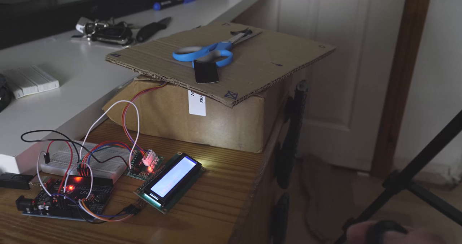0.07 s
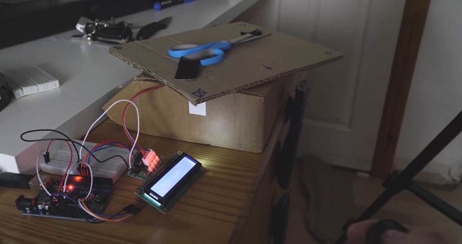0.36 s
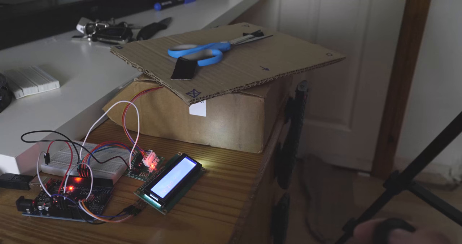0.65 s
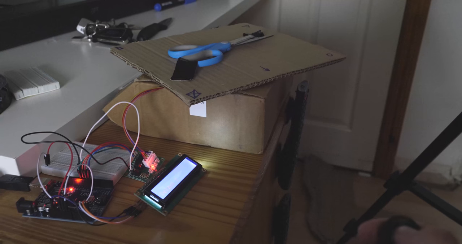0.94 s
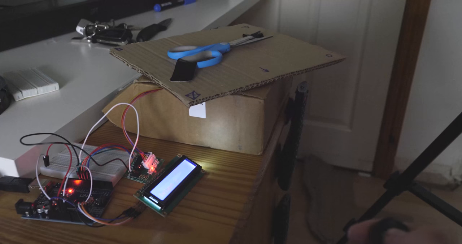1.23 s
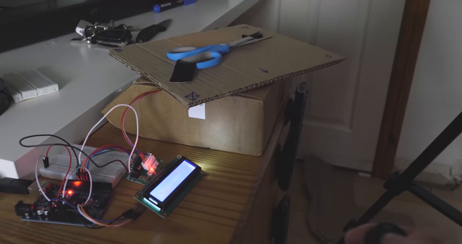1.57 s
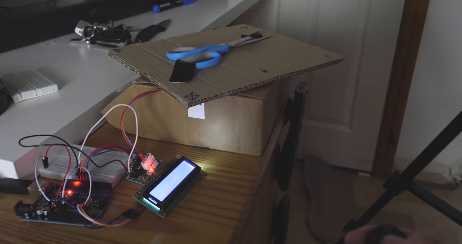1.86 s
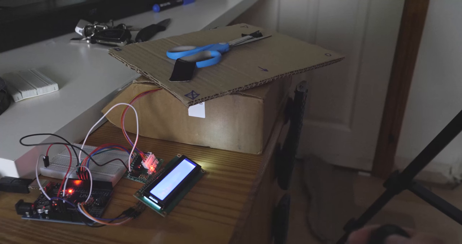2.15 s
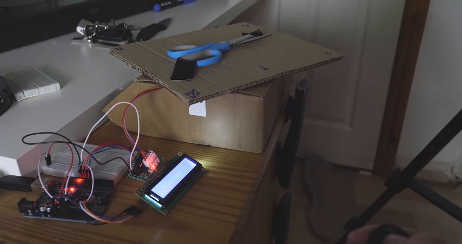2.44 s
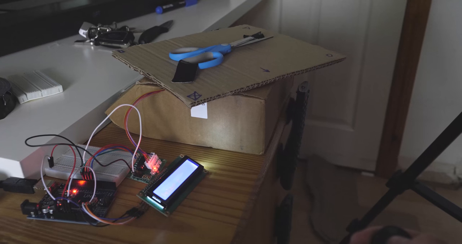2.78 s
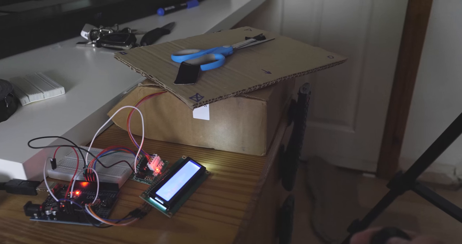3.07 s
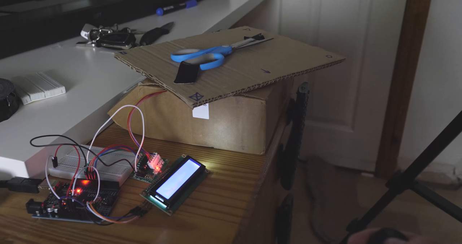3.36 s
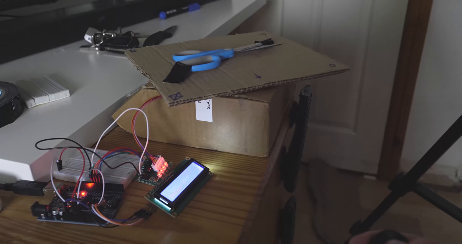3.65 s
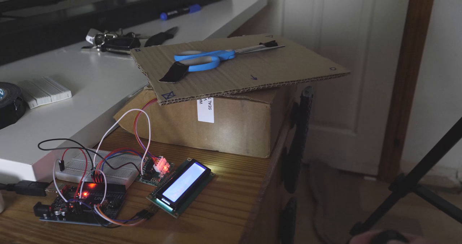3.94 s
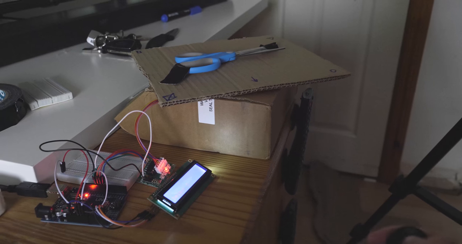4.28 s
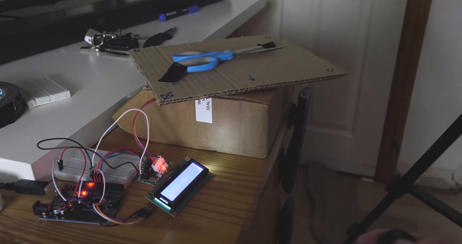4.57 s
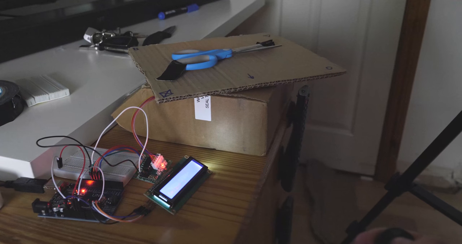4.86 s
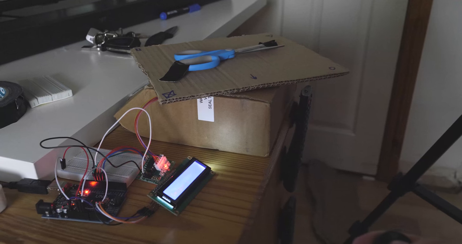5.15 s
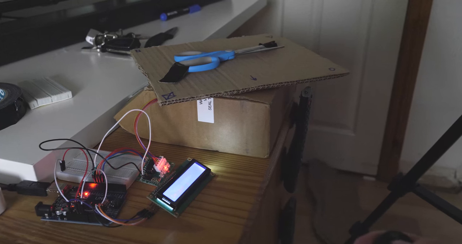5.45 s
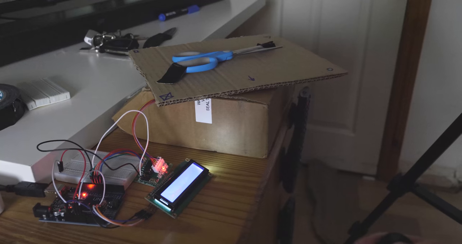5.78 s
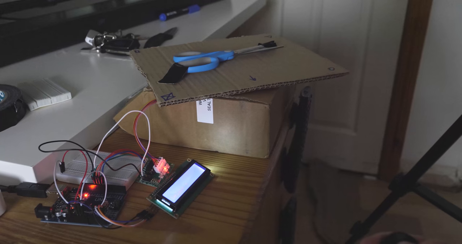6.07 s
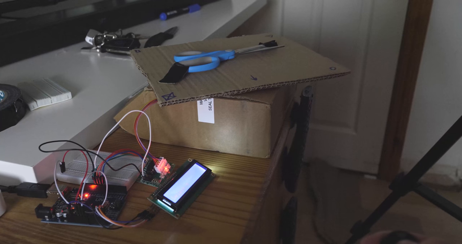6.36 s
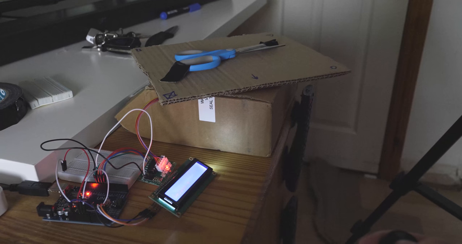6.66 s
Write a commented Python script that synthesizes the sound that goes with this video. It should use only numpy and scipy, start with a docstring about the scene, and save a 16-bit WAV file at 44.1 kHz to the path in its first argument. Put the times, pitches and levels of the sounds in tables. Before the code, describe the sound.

A small fan motor hums faintly and steadily in a small room, with a very thin, high electronic whine. At about 0.3 seconds a cardboard sheet slides briefly over a box, a soft scrape with two tiny squeaks. From 1.0 to 1.4 seconds a nearby reflex camera fires in a quick run of sharp mirror and shutter clicks, with short gear rasps and a slight thud under the heavier ones. A crisp double click follows at 2.0 seconds. Soft, dull handling bumps come at about 3.2 seconds, then a light touch and another short cardboard scrape from 3.5 to 3.9. The camera repeats its run of clicks from 4.3 to 4.7 seconds and its double click at about 5.4. One last faint bump comes near 6.7 seconds over the hum. The clicks are by far the loudest sounds, each with a short ring and little room echo.

```python
"""A reflex camera on a tripod fires in a small room, twice over: its motor cycles mirror and shutter in
a quick run of clicks, and a double click follows a moment later. Each click is a part hitting its stop,
a crack with a short ring; gears rasp ahead of the blows and the body thuds under the heavy ones.
Before each run a cardboard sheet slides over a box, its fibres catching and slipping. There are a few
soft handling bumps, and throughout a small fan motor hums and some electronics whine faintly."""
import sys
import numpy as np
from scipy import signal
from scipy.fft import rfft, irfft, next_fast_len
from scipy.io import wavfile
from scipy.ndimage import uniform_filter1d

SR = 44100
rng = np.random.default_rng(int(sys.argv[2]) if len(sys.argv) > 2 else 0)


def put_to_file(sound):
    """Save the sound as 16-bit audio at rate SR, in the file named by the first command-line argument."""
    columns = np.atleast_2d(sound).T  # one column per channel
    safe = np.clip(columns, -1, 1)
    whole_steps = np.round(safe * 32767)
    wavfile.write(sys.argv[1], SR, whole_steps.astype(np.int16))


N = 300762


def amp(db):
    """Decibels to gain."""
    return 10 ** (np.asarray(db) / 20)


def unit(x):
    """Scale to rms 1."""
    return x / np.sqrt(np.mean(x ** 2))


def pan(db):
    """Left and right gains, with the left louder by db."""
    return amp(np.array([[db], [-db]]) / 2)


def tint(x, points):
    """Equalise along a curve of (Hz, dB) points."""
    hz, db = np.transpose(points)
    size = next_fast_len(len(x) + SR // 10)
    bin_hz = np.maximum(np.fft.rfftfreq(size, 1 / SR), 1)
    gain = amp(np.interp(np.log(bin_hz), np.log(hz), db))
    return irfft(rfft(x, size) * gain, size)[:len(x)]


def even(burst, bins=32):
    """Level a burst's spectrum so that no pitch sticks out, keeping its spread in time."""
    spectrum = rfft(burst, 2 * len(burst))
    smooth_power = uniform_filter1d(np.abs(spectrum) ** 2, bins)
    return irfft(spectrum / np.sqrt(smooth_power))[:len(burst)]


def fade(t, t60):
    """Exponential decay, 60 dB down after t60 seconds."""
    return np.exp(-np.log(1000) * t / t60)


def walk(rate_hz):
    """Random drift of rms 1 that heads for a new value rate_hz times a second."""
    hold = int(SR / rate_hz)
    steps = np.repeat(rng.standard_normal(N // hold + 1), hold)
    return unit(uniform_filter1d(steps, hold)[:N])


def add(track, s, sound):
    """Mix a sound into a track at s seconds."""
    i = int(s * SR)
    track[i:i + len(sound)] += sound[:N - i]


def timed(cues, offset_s, offset_db):
    """Shift (seconds, dB) cues in time and level."""
    return [(s + offset_s, db + offset_db) for s, db in cues]


def spread(mid, side):
    """Stereo image of a diffuse sound, nearly mono in the bass."""
    # Stereo width. Each row: frequency in Hz, side minus mid in dB.
    width = [(130, -85), (300, -25), (600, -11.5), (1500, -6), (5000, -5), (7000, -9.5), (9000, -19),
             (10500, -6), (14000, 0)]
    side = tint(side, width)
    return np.array([mid + side, mid - side])


def near(x, pan_db=-3.5):
    """Direct sound and early echoes from the nearest surfaces."""
    # The top treble leans left. Each row: frequency in Hz, side level in dB.
    treble_side = [(8000, -36), (11000, -22), (13000, -10), (15500, -4)]
    # Desk, door and wall. Each row: delay in seconds, level in dB, left minus right in dB.
    echoes = [(.0011, -46, -10), (.0038, -19.5, 9), (.0085, -21.5, 1), (0.0108, -14.5, 7)]
    out = pan(pan_db) * x + np.array([[1], [-1]]) * tint(x, treble_side)
    for delay, db, side_db in echoes:
        out += amp(db) * pan(side_db) * np.pad(x, (int(delay * SR), 0))[:N]
    return out


def reverb(x, pan_db=0.3, t60=0.24, build_s=0.0061):
    """The short diffuse tail of a small furnished room."""
    # Standing waves. Each row: frequency in Hz, level in dB.
    room_modes = [(932, -47.5), (1360, -47), (2614, -55)]
    # Tone of the tail. Each row: frequency in Hz, gain in dB.
    room_colour = [(200, 9), (1000, 1.5), (3000, 0.5), (7000, 0), (10500, -2.5), (12500, -6), (15500, -3)]
    t = np.arange(SR // 2) / SR
    envelope = fade(t, t60) * (1 - np.exp(-(t / build_s) ** 2))
    mid, side = (even(noise * envelope) for noise in rng.standard_normal((2, len(t))))
    mid += envelope * sum(amp(db) * np.sin(2 * np.pi * hz * t) for hz, db in room_modes)
    response = pan(pan_db) * np.array([tint(ear, room_colour) for ear in spread(mid, side)])
    return signal.oaconvolve(x[None], response, axes=1)[:, :N]


def whine():
    """Thin steady electronic tones, so short in wavelength that left and right are out of step."""
    # Each row: frequency in Hz, level in dB.
    tones = [(12737, -84), (15691, -67)]
    t = np.arange(N) / SR
    phase = np.array([[0], [np.pi / 2]])
    return np.sqrt(2) * sum(amp(db) * np.sin(2 * np.pi * hz * t + phase) for hz, db in tones)


def fan(hum_hz=120.6, wander=0.00396, throb_db=2, gust_db=3.2, air_db=-59):
    """A motor hum wavers over rushing air while the housing's resonances swell and fade."""
    # Motor hum. Each row: harmonic number, level in dB.
    harmonics = [(1, -70), (2, -68.5), (3, -74.5), (4, -80.5), (5, -79.5), (6, -80.5), (12, -81),
                 (14, -80.5)]
    # Housing resonances, each a narrow noise band. Each row: centre in Hz, width in Hz, level in dB.
    housing = [(131, 16, -66), (1700, 50, -82)]
    # Fan air and room rumble. Each row: frequency in Hz, gain in dB.
    air_colour = [(30, -35), (50, -27.5), (80, -26), (105, -8), (135, -1.5), (158, -14.5), (200, -10),
                  (290, -17), (420, -14.5), (600, -22), (1450, -20.5), (2000, -25.5), (11500, -33.5),
                  (15000, -38.5)]
    t = np.arange(N) / SR
    phase = 2 * np.pi * hum_hz * np.cumsum(1 + wander * walk(6)) / SR
    hum = sum(amp(db + throb_db * walk(3.796)) * np.sin(k * phase) for k, db in harmonics)
    drone = sum(amp(db) * walk(width) * np.sin(2 * np.pi * hz * t + walk(width))
                for hz, width, db in housing)
    noise = spread(*rng.standard_normal((2, N)))
    air = unit(np.array([tint(ear, air_colour) for ear in noise]))
    gusts = amp(gust_db * walk(2.25))
    return np.sqrt(2) * (hum + drone * gusts) + amp(air_db) * air


def bumps(attack_s=0.014, t60=0.091):
    """Soft handling knocks, each a puff of dull noise."""
    # Each row: start in seconds, level in dB.
    knocks = [(3.14, -50), (3.19, -47), (6.682, -55)]
    # Their muffled tone. Each row: frequency in Hz, gain in dB.
    bump_colour = [(60, -24), (190, 9), (350, -1), (700, -8), (1500, -2), (3000, -46), (12000, -40)]
    t = np.arange(SR // 4) / SR
    envelope = fade(t, t60) * (1 - np.exp(-t / attack_s))
    out = np.zeros(N)
    for s, db in knocks:
        dull_noise = unit(tint(rng.standard_normal(len(t)), bump_colour))
        add(out, s, amp(db) * dull_noise * envelope)
    return out


def rubbing(t, scrape_width=0.53, attack_s=0.0079, glide_t60=0.23, tap_t60=0.11):
    """Friction envelope: a pushed sheet breaks loose with a scrape, glides evenly and dies away."""
    # Each row: start, time to the scrape's peak and length in seconds, scrape and glide levels in dB.
    pushes = [(0.269, 0.03, 0.23, -52.5, -51.5), (3.589, 0.049, 0.24, -47, -59)]
    # A touch on the sheet before a push. Each row: start in seconds, level in dB.
    taps = [(3.485, -51)]
    out = np.zeros(N)
    for start, swell, length, scrape_db, glide_db in pushes:
        age = t - start
        scrape = amp(scrape_db) * np.exp(-((age - swell) / (scrape_width * swell)) ** 2)
        glide = amp(glide_db) * fade(np.maximum(age - length, 0), glide_t60)
        out += np.hypot(scrape, glide) * np.clip(age / attack_s, 0, 1)
    for s, db in taps:
        out += amp(db) * (t >= s) * fade(np.abs(t - s), tap_t60)
    return out


def cardboard(grain_db=5, flutter_db=2.0, chirp_wobble=0.035):
    """Paper fibres catch and slip as the sheet slides; its edge chirps where it sticks."""
    # Tone of the slide. Each row: frequency in Hz, gain in dB.
    card_colour = [(100, -17), (250, -2), (500, -1), (850, 1), (1300, -5), (2200, -6.5), (4500, -9.5),
                   (8000, -11), (15000, -15)]
    # Each row: centre time and length in seconds, pitch in Hz, level in dB.
    chirps = [(0.305, 0.027, 843, -43.5), (.395, 0.028, 780, -47.5)]
    t = np.arange(N) / SR
    slips = rng.standard_normal(N) * amp(grain_db * rng.standard_normal(N))
    out = unit(tint(slips, card_colour)) * rubbing(t) * amp(flutter_db * walk(120))
    wobbly_time = np.cumsum(1 + chirp_wobble * walk(300)) / SR
    for s, length, hz, db in chirps:
        envelope = np.exp(-(2 * (t - s) / length) ** 2)
        out += amp(db) * envelope * np.sin(2 * np.pi * hz * wobbly_time)
    return out


def thuds(blows):
    """Heavy blows shake the whole camera body on its tripod."""
    # Body resonances. Each row: frequency in Hz, level in dB, t60 in seconds.
    body_modes = [(188.6, -48, 0.15), (298, -61.5, 0.11), (446, -62.5, 0.041)]
    t = np.arange(SR // 4) / SR
    ring = sum(amp(db) * np.sin(2 * np.pi * hz * t) * fade(t, t60) for hz, db, t60 in body_modes)
    out = np.zeros(N)
    for s, db in blows:
        add(out, s, amp(db) * ring)
    return out


def motor(blows, stroke, gear_db, idle_db=-16, bite_db=-6, stop_db=-14,
          tooth_hz=720, tooth_db=3, grit_db=3, fizz_db=-8):
    """Before each blow the gears spin freely, bite, and rasp tooth by tooth as they tension springs."""
    # Midrange rasp and treble fizz of the gears. Each row: frequency in Hz, gain in dB.
    gear_colour = [(100, -46), (450, -25), (800, -6), (1100, -2), (1550, 5.5), (1850, 2), (2200, 3),
                   (3000, 1.5), (6500, -1), (9000, -8.5), (15500, -57)]
    fizz_colour = [(100, -60), (6000, -36), (10000, 2.5), (13000, 2), (15500, -9)]
    lead, spin, tension, ease = stroke
    bite, full, stop = np.cumsum([spin, tension, ease])
    t = np.arange(int(stop * SR)) / SR
    load_db = np.where(t < bite, idle_db, np.interp(t, [bite, full, stop], [bite_db, 0, stop_db]))
    out = np.zeros(N)
    for s, db in blows:
        teeth = amp(tooth_db * np.cos(2 * np.pi * tooth_hz * t) + grit_db * rng.standard_normal(len(t)))
        scrape = teeth * rng.standard_normal(len(t))
        rasp = unit(tint(scrape, gear_colour))
        fizz = unit(tint(scrape, fizz_colour)) * amp(fizz_db + load_db / 2)  # brighter under load
        add(out, s - lead, (rasp + fizz) * amp(gear_db + db + load_db))
    return out


def bites(blows, stroke, pawl_db):
    """Cues for the pawl, which ticks as a stroke's free spin ends."""
    lead, spin = stroke[:2]
    return timed(blows, spin - lead, pawl_db)


def strikes(blows, modes, colour, ring_db, crack_db, crack_t60, contact_s, wet_db,
            ring_room_db=-10, radiate_hz=320, vary=0.94, plastic_t60=0.04):
    """A part hits its stop: a crack of tiny bounces, and a ring that the plastic body cuts short."""
    t = np.arange(SR // 10) / SR
    ring = sum(amp(db) * np.sin(2 * np.pi * hz * t) * fade(t, min(t60, plastic_t60))
               for hz, db, t60 in modes)
    ring *= 1 - np.exp(-(t / contact_s) ** 2)
    pattern = rng.standard_normal(len(t))  # the share of the bounces that repeats on every blow
    rings, cracks = np.zeros((2, N))
    for s, db in blows:
        bounces = (pattern + vary * rng.standard_normal(len(t))) * fade(t, crack_t60)
        crack = tint(even(bounces) * fade(t, 4 * plastic_t60), colour)
        add(cracks, s, amp(db + crack_db) * crack)
        add(rings, s, amp(db + ring_db) * ring)
    # So small a body radiates little bass.
    low_cut = signal.butter(2, radiate_hz, "highpass", fs=SR, output="sos")
    rings, cracks = signal.sosfilt(low_cut, [rings, cracks])
    # The ringing panel faces the listener, while the crack scatters all round the room.
    return near(rings + cracks) + amp(wet_db) * reverb(amp(ring_room_db) * rings + cracks)


def camera(motor_wet_db=-2.5):
    """Gears, cocking lever, mirror and shutter blades act in a set order round each shutter snap."""
    # Full cycles (cock, lift the mirror, snap, drop it, cock again), double clicks (lift, latch and
    # snap) and the release button. Each row: time of the snap or press in seconds, level in dB.
    cycles = [(1.0730, -0.32), (4.4306, -0.2)]
    doubles = [(2.0277, -0.44), (5.3868, -0.63)]
    presses = [(5.270, 4.5)]
    # Each part's ring. Each row: frequency in Hz, level in dB, t60 in seconds before the plastic's cap.
    blade_modes = [(717, -11, 0.016), (944, -35.5, 0.0067), (1348, -18, 0.11), (1552, -7, 0.019),
                   (2224, -10.5, 0.022), (2386, -23.5, 0.052), (3280, -49, 0.026), (4220, -23, 0.041),
                   (5576, 16.5, 0.0042)]
    mirror_modes = [(738, -26, 0.075), (970, -24, 0.019), (1248, -6.5, 0.0092), (1530, -8.5, 0.02),
                    (2016, -21, 0.06), (2270, -5, 0.019), (3505, -19.5, 0.041), (4900, -44, 0.047)]
    lever_modes = [(877, -33, 0.041), (1277, -16, 0.019), (1520, -23, 0.075), (2078, -12.5, 0.016),
                   (2430, -67, 0.03), (3260, -19.5, 0.016)]
    button_modes = [(2080, -20, 0.028), (2280, -24, .03)]
    # Tone of each part's contact. Each row: frequency in Hz, gain in dB.
    blade_crack = [(100, -54), (450, -39), (900, -1), (1500, 7.5), (1850, 6), (2400, 1.5), (5500, 2.5),
                   (8000, -1), (10500, 1), (12500, -7), (15500, -20)]
    mirror_crack = [(100, -32), (450, -2), (800, 2.5), (1400, 18.5), (1900, 5.5), (3000, 11), (6500, 12.5),
                    (9500, 5), (12500, 7.5), (15500, -7)]
    lever_crack = [(100, -19), (450, -48), (1000, -1.5), (2500, 6), (4500, -1.5), (6500, -0.5),
                   (9000, -4.5), (13000, -2.5), (15500, -25)]
    # Motor strokes: lead before the blow, free spin, tensioning and easing, all in seconds.
    cock_stroke = (0.065, 0.0175, 0.018, 0.023)
    lift_stroke = (0.017, 0.0075, 0.002, 0.0085)
    recock_stroke = (0.049, 0.006, 0.019, 0.023)

    cocks, recocks = timed(cycles, -0.0941, 0), timed(cycles, 0.2778, 0)
    cycle_lifts, double_lifts = timed(cycles, -0.0346, 0), timed(doubles, -0.0465, 0)
    lifts = cycle_lifts + double_lifts
    knocks = timed(cocks, 0, 4) + timed(recocks, 0, 4.5)
    slaps = timed(cycle_lifts, 0, -5) + timed(double_lifts, 0, -9)
    latches = timed(doubles, -0.005, -1.5)
    snaps = timed(cycles + doubles, 0, 3)
    drops = timed(cycles, 0.0998, -1.73)
    ticks = (bites(cocks, cock_stroke, pawl_db=6.3) + bites(lifts, lift_stroke, pawl_db=5)
             + bites(recocks, recock_stroke, pawl_db=-7))

    gears = (motor(cocks, cock_stroke, gear_db=-24.5) + motor(lifts, lift_stroke, gear_db=-24.5)
             + motor(recocks, recock_stroke, gear_db=-23))
    blades = strikes(snaps, blade_modes, blade_crack, ring_db=-1.5, crack_db=8,
                     crack_t60=0.035, contact_s=0.0044, wet_db=-2.5)
    mirror_up = strikes(slaps, mirror_modes, mirror_crack, ring_db=-1.5, crack_db=0,
                        crack_t60=0.016, contact_s=0.0008, wet_db=-0.5)
    mirror_down = strikes(drops, mirror_modes, mirror_crack, ring_db=1, crack_db=-1,
                          crack_t60=0.03, contact_s=0.0013, wet_db=-0.5)
    lever = strikes(knocks, lever_modes, lever_crack, ring_db=3.5, crack_db=-3.5,
                    crack_t60=0.039, contact_s=0.0029, wet_db=0.5)
    pawls = strikes(ticks + latches, lever_modes, lever_crack, ring_db=-24, crack_db=-10.5,
                    crack_t60=0.026, contact_s=0.0001, wet_db=11.5)
    button = strikes(presses, button_modes, lever_crack, ring_db=-26, crack_db=-35,
                     crack_t60=0.018, contact_s=0.00092, wet_db=-2)
    clicks = blades + mirror_up + mirror_down + lever + pawls + button
    return clicks + thuds(snaps + drops) + near(gears) + amp(motor_wet_db) * reverb(gears)


def scene(foreground_db=-3.5, wet_db=-2):
    """Camera, cardboard and bumps in the room, over a bed of fan and whine."""
    handling = cardboard() + bumps()
    foreground = camera() + near(handling, pan_db=0) + amp(wet_db) * reverb(handling)
    bed = (fan() + whine()) * pan(0.17)
    return amp(foreground_db) * foreground + bed


def record(dry, low_hz=60, top_hz=16000):
    """Thin the deep bass and cut the top steeply."""
    low_cut = signal.butter(2, low_hz, "highpass", fs=SR, output="sos")
    high_cut = signal.ellip(10, 0.1, 70, top_hz, fs=SR, output="sos")
    return signal.sosfilt(high_cut, signal.sosfilt(low_cut, dry))


dry = scene()
out = record(dry)
put_to_file(out)
```